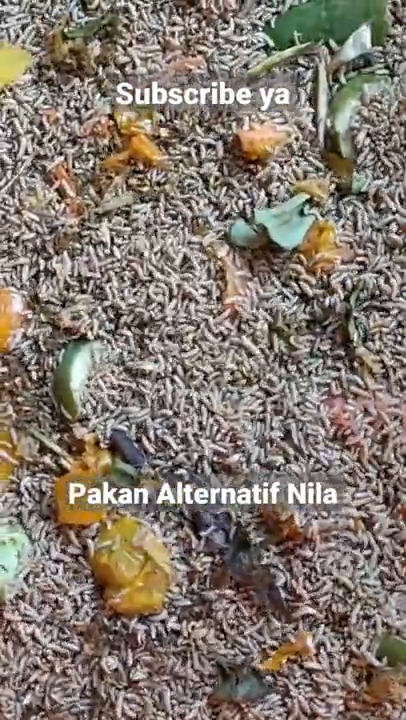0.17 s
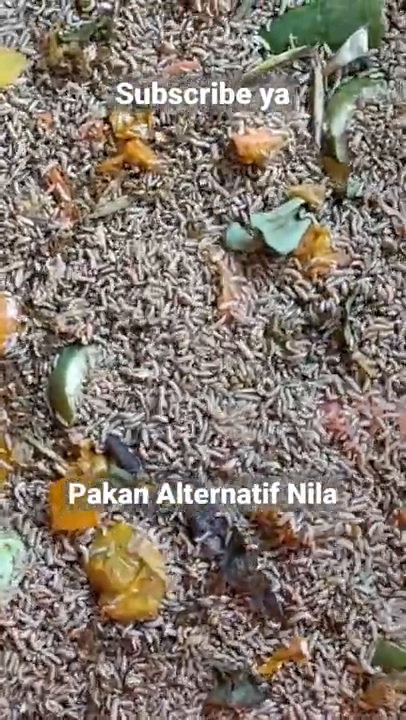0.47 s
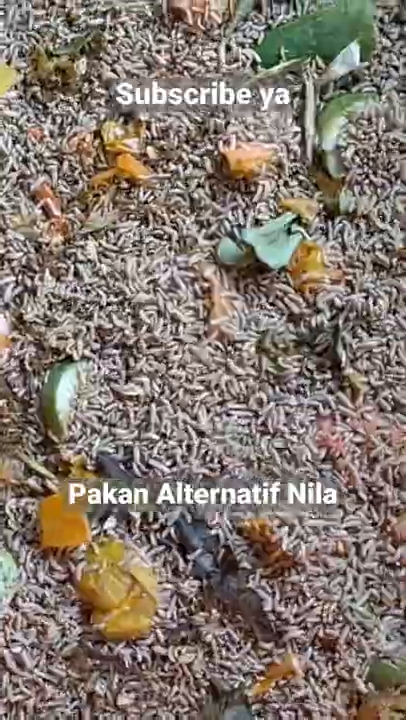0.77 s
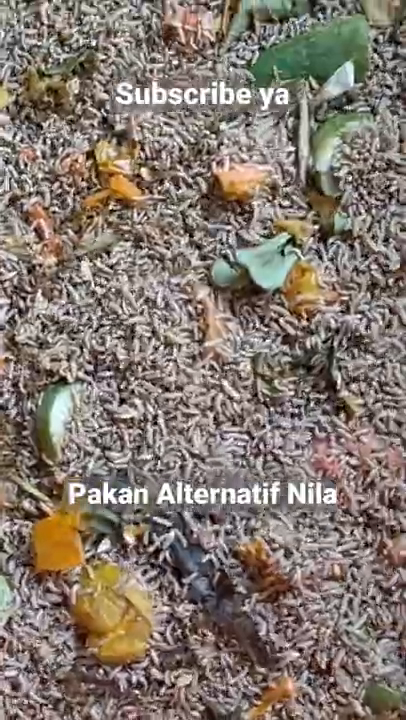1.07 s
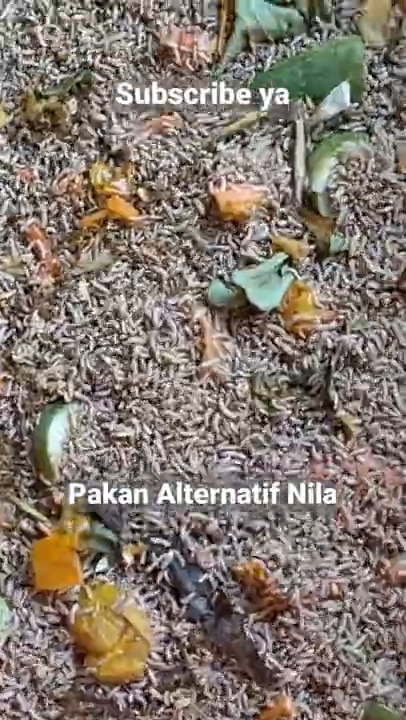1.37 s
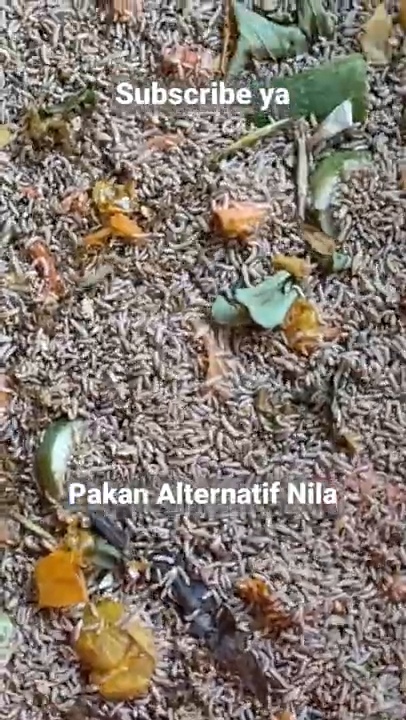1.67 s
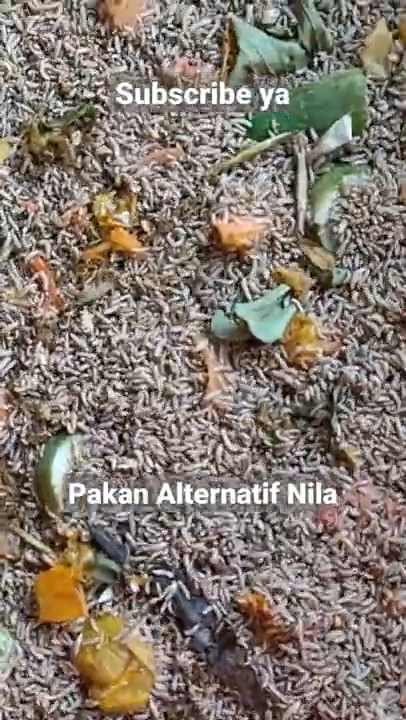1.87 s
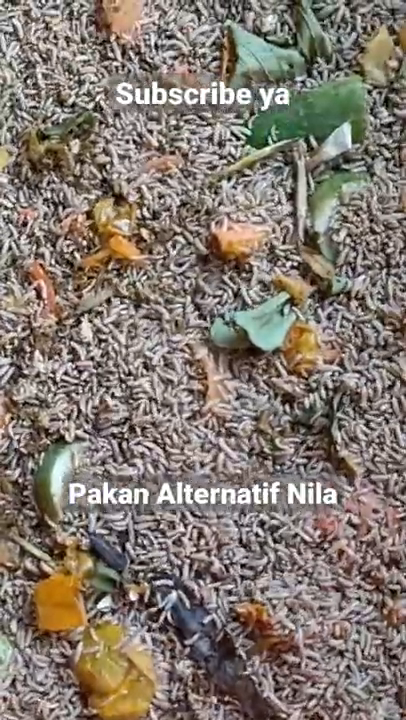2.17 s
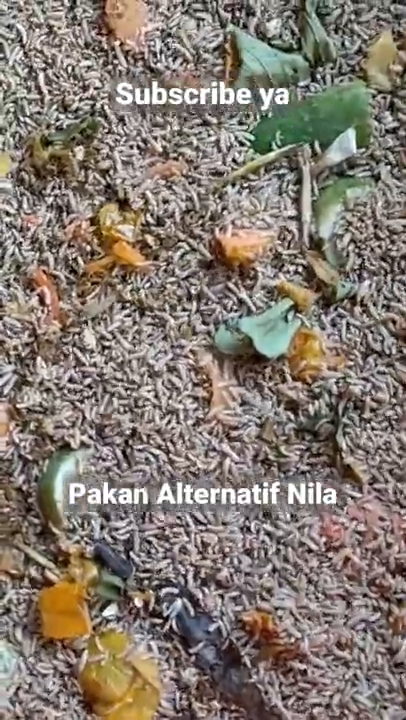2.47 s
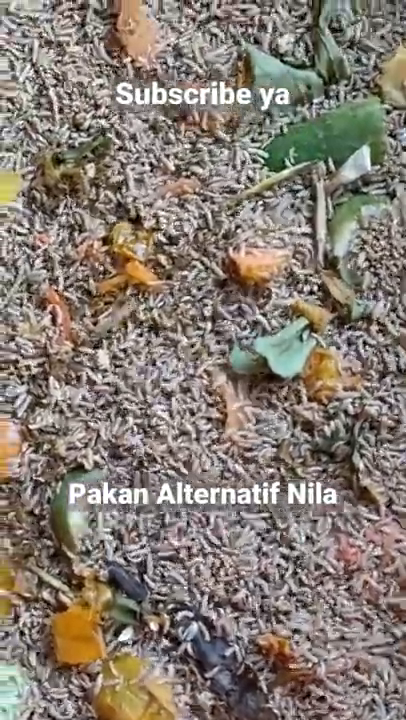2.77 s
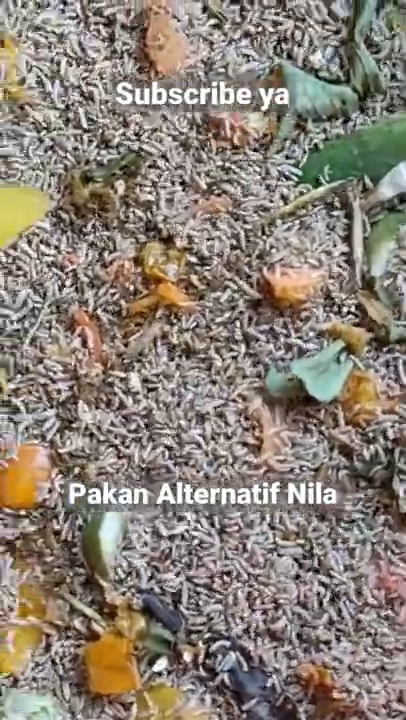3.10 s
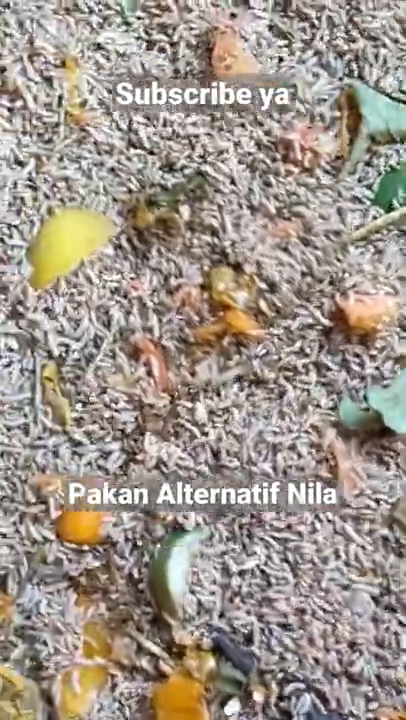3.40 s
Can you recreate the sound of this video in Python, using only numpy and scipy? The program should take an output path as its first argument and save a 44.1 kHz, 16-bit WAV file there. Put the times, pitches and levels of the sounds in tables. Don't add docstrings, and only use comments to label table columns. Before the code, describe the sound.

Countless larvae squirming in wet food scraps give a steady, close, wide crackling hiss throughout, slightly grainy from noise reduction. Small bubbles pop near 0.8, 1.0 on the right, 1.8, 3.1, 3.3 and 3.5 seconds. A distant cricket chirps in pure pulses around 0.2, 1.0, 1.9 and 2.9. A bird peeps briefly at 3.4, over faint far engine hum and very light air puffs.

```python
import sys
import numpy as np
from scipy import signal
from scipy.fft import rfft, irfft, next_fast_len
from scipy.io import wavfile
from scipy.ndimage import uniform_filter1d, map_coordinates

SR = 44100
rng = np.random.default_rng(int(sys.argv[2]) if len(sys.argv) > 2 else 0)


def boost_factor(decibels):
    exponent = np.asarray(decibels, float) / 20
    return 10 ** exponent


def unload_audio(sound):
    columns = np.transpose(np.atleast_2d(sound))
    steps = np.round(np.clip(columns, -1, 1) * 32767)
    wavfile.write(sys.argv[1], SR, steps.astype(np.int16))


N = 156114

# t/s, activity level/dB
ACTIVITY = [(0.0, -41), (0.03, -43), (1.25, -42.5), (1.28, -41), (1.52, -43), (2.44, -42.5), (2.66, -43.5),
            (2.87, -42.5), (3.11, -42.5), (3.15, -41.5), (3.19, -42.5), (3.41, -42.5), (3.43, -42),
            (3.54, -43.5)]
# f/Hz, density/dB
BODY_SPECTRUM = [(250, -3), (420, -6.5), (770, -3.5), (1300, -1.5), (2100, -1.5), (3600, -1), (4700, -4),
                 (5400, -13.5)]
# f/Hz, density/dB
FIZZ_SPECTRUM = [(4600, -3), (5400, -1.5), (6300, -5), (6800, -9), (7700, -11), (8200, -17), (11400, -20.5),
                 (11900, -27)]
# f/Hz, density/dB
SHEEN_SPECTRUM = [(10500, -29), (12300, -8), (13500, -8), (15400, -6)]
# t/s, f/Hz, peak level/dB, direction (-1 right .. 1 left), pitch rise
POPS = [
    (.760, 1058, -33.5, 0.26, .3),
    (0.955, 1400, -31.5, -0.82, 0.47),
    (1.755, 710, -35.5, .1, 4.2),
    (1.797, 1544, -38, 0.21, 1.4),
    (3.084, 846, -35.5, -0.22, .36),
    (3.257, 960, -37, -0.51, 0.34),
    (3.515, 870, -38, .1, 0.34),
]
# t/s, length/s, level/dB, direction (-1 right .. 1 left)
CRICKET_PULSES = [(0.133, 0.029, -42.5, 0.16), (0.187, 0.087, -44.5, 0.18), (.25, .035, -50, .35),
                  (.95, .04, -46, 0.28), (1.006, .07, -47.5, 0.43), (1.06, 0.054, -39.5, 0.39),
                  (1.125, .04, -45, .35), (1.843, 0.037, -42, 0.21), (1.91, 0.097, -42.5, 0.13),
                  (1.992, .065, -40.5, 0.31), (2.087, .03, -44, .02), (2.764, 0.057, -44, 0.18),
                  (2.844, 0.052, -45, .02), (2.917, 0.054, -41.5, 0.38), (3.008, 0.049, -46, .02)]
# t/s, length/s, f/Hz, level/dB
PEEPS = [
    (3.396, .018, 3900, -51),
    (3.412, .023, 3970, -43),
    (3.434, 0.023, 3800, -39),
]
# t/s, length/s, level/dB
ENGINE_SWELLS = [
    (.08, 0.18, -57),
    (.88, 0.34, -53.5),
]
# f/Hz, density/dB
HUM_SPECTRUM = [(75, -19), (100, -11.5), (130, -3.5), (180, 1.5), (240, -2), (310, -16), (420, -2.5),
                (700, -22)]
# f/Hz, density/dB
AIR_SPECTRUM = [(14, -37), (28, -17), (52, -11), (88, -3), (160, -44)]
# t/s, peak level/dB, f/Hz
PUFFS = [(.084, -67, 55), (.31, -57, 55), (.385, -62, 45.4), (.471, -58, 50), (.545, -61, 28),
         (.644, -60, 34.8), (.747, -63, 35), (1.06, -65, 25), (1.181, -62, 30), (1.258, -61, 55),
         (1.368, -66, 35), (1.45, -66, 50), (1.55, -65, 25), (1.624, -62, 55), (1.675, -63, 35),
         (1.772, -58, 45), (1.87, -64, 40), (1.936, -61, 55), (2.01, -61, 70), (2.131, -57, 57.6),
         (2.225, -60, 22), (2.305, -56, 36), (2.37, -62, 65), (2.5, -65, 30), (2.578, -67, 50),
         (2.716, -62, 35), (2.77, -64, 55), (2.907, -64, 50), (2.96, -62, 45), (3.048, -59, 55),
         (3.18, -66, 40), (3.245, -65, 40), (3.3, -64, 40), (3.41, -63, 40.4)]
# f/Hz, level/dB
PORT_TILT = [(150, 0), (400, 1.1), (1300, -1), (5000, -.7), (8800, 2.2), (14000, 2)]
# f/Hz, level re the usual level/dB
GATE_THRESHOLD = [(100, -26), (600, -7), (1250, -4), (2200, -6.5), (3300, -4), (4600, -4), (5500, -1),
                  (7600, 1)]
GATE_ROWS_HZ = [5500, 6700, 7350, 8100]

PORT_DELAY_S = 0.1658 / 343
T = np.arange(N) / SR
FFT_SIZE = next_fast_len(N + 8192)
FFT_HZ = np.fft.rfftfreq(FFT_SIZE, 1 / SR)


def unit(x):
    return x / np.sqrt(np.mean(x ** 2) + 1e-20)


def along(points, hz):
    f, value = np.transpose(points)
    return np.interp(np.log(hz + 1), np.log(f + 1), value)


def wobble(rate):
    return map_coordinates(rng.standard_normal(200), [T * rate])


def shaped(spectrum):
    low, high = spectrum[0][0] / 2, spectrum[-1][0] * 2
    return boost_factor(along([(low, -120)] + list(spectrum) + [(high, -120)], FFT_HZ))


def swell(start, length):
    return np.sin(np.pi * np.clip((T - start) / length, 0, 1))


def patchy(patchy_db):
    z = signal.stft(rng.standard_normal((2, N + 512)), nperseg=512)[2]
    field = rng.standard_normal(z.shape[1:])
    field = uniform_filter1d(uniform_filter1d(field, size=5, axis=0), size=7, axis=1)
    return signal.istft(z * boost_factor(patchy_db * unit(field)), nperseg=512)[1][:, :N]


def ports(buses, sides, colour=1):
    z = rfft(buses, FFT_SIZE)
    lead = np.exp(1j * np.pi * FFT_HZ * np.asarray(sides)[:, None] * PORT_DELAY_S)
    left, right = (z * lead).sum(0), (z / lead).sum(0)
    return irfft(np.array([left, right]) * colour, FFT_SIZE)[:, :N]


def around(pair, spectrum):
    axis_db, left_db = 1.5, .5
    grid = np.linspace(0, SR / 2, num=600)
    sides = np.cos(np.linspace(0, np.pi, num=90))
    weight = boost_factor(2 * axis_db * sides ** 2 + 2 * left_db * sides)
    alike = np.exp(-2j * np.pi * grid[:, None] * sides * PORT_DELAY_S) @ weight / weight.sum()
    alike = np.interp(FFT_HZ, grid, alike.real) + 1j * np.interp(FFT_HZ, grid, alike.imag)
    a, b = rfft(pair, FFT_SIZE) * shaped(spectrum)
    other = alike * a + np.sqrt(abs(1 - abs(alike) ** 2)) * b
    return unit(irfft(np.array([a, other]), FFT_SIZE)[:, :N])


def clicks():
    count, length = 9000, 256
    u, g = rng.random((count, 3)), rng.standard_normal(count)
    hz = np.clip(2212 * np.exp(0.746 * g), 400, 9000)[:, None]
    cycles = hz * np.arange(length) / SR
    size = boost_factor(-2 * np.log(u[:, 1:2] + 1e-4)) * np.sqrt(hz)
    ring = np.sin(2 * np.pi * cycles * (1 + 0.018 * cycles))
    wave = size * ring * np.exp(-3 * cycles / 4.34) * (1 - np.exp(-cycles))
    row = N + length
    start = (u[:, 2] * 2).astype(int) * row + (u[:, 0] * N).astype(int)
    at = start[:, None] + np.arange(length)
    return unit(np.bincount(at.ravel(), wave.ravel(), 2 * row).reshape(2, -1)[:, :N])


def larvae():
    click_share, fizz_db, sheen_db, fizz_grows = 0.079, -8, -30, 1.2
    s, level = np.transpose(ACTIVITY)
    mean_db = level.mean() + 4.0
    swing_db = np.interp(T, s, level - level.mean()) + 0.16 * wobble(9.61) + 0.17 * wobble(16)
    hiss = np.sqrt(1 - click_share) * unit(patchy(1.0))
    body = around(hiss + np.sqrt(click_share) * clicks(), BODY_SPECTRUM)
    fizz = boost_factor(fizz_db) * around(patchy(-1.0), FIZZ_SPECTRUM)
    sheen = boost_factor(sheen_db) * around(patchy(1.2), SHEEN_SPECTRUM)
    treble_gain = boost_factor(fizz_grows * swing_db + 0.18 * wobble(8))
    return boost_factor(mean_db) * (boost_factor(swing_db) * body + treble_gain * (fizz + sheen))


def pops():
    t60_s, attack_s, rise_damps, longest_s = 0.065, 0.0014, .04, .15
    start, hz, db, side, rise = np.transpose(POPS)[:, :, None]
    u = np.clip(T - start, 0, longest_s)
    ring = np.sin(2 * np.pi * hz * u * (1 + rise * u / t60_s))
    ring = ring * (1 - np.exp(-u / attack_s)) * (u < longest_s)
    decay_db = -60 * u / t60_s * (0.5 + rise_damps * rise ** 2)
    return ports(ring * boost_factor(db + decay_db), side[:, 0])


def cricket():
    pitch_hz, sag_hz = 2948, 25
    turns = pitch_hz * np.cumsum(1 + 0.00297 * wobble(48)) / SR
    waver = boost_factor(0.6 * wobble(36.8))
    pulses = []
    for start, length, db, _ in CRICKET_PULSES:
        shape = swell(start, length)
        envelope = np.sqrt(abs(shape)) * (shape > 1e-6)
        sag = sag_hz * (T - start - length / 2) ** 2 / (2 * length)
        pulses.append(boost_factor(db) * envelope * np.sin(2 * np.pi * (turns - sag)))
    return ports(waver * np.array(pulses), [side for *_, side in CRICKET_PULSES])


def bird():
    sag_hz_per_s, rough_db = 1700, 0.5
    notes = np.zeros(N)
    for start, length, hz, db in PEEPS:
        u = T - start
        notes += boost_factor(db) * swell(start, length) * np.sin(2 * np.pi * (hz - sag_hz_per_s * u) * u)
    return ports(notes[None] * boost_factor(rough_db * wobble(50)), [.05])


def yard(x):
    t60_s, length = .12, SR // 4
    tail = rng.standard_normal((2, length)) * boost_factor(-60 * np.arange(length) / SR / t60_s)
    return signal.fftconvolve(x, tail / np.linalg.norm(tail[0]), axes=1)[:, :N]


def engine():
    turns = 750 * np.cumsum(1 + 0.0121 * wobble(12)) / SR
    tone = np.sin(2 * np.pi * turns) * boost_factor(1.8 * wobble(18.5))
    return tone * sum(boost_factor(db) * swell(start, length) for start, length, db in ENGINE_SWELLS)


def puffs():
    length, gain_db, unlike_db = 0.049, 2, 1
    opposite = np.array([[1], [-1]])
    total = np.zeros((2, N))
    for start, db, hz in PUFFS:
        a, b, phase = rng.standard_normal(3)
        gain = boost_factor(db + gain_db + unlike_db * a * opposite)
        angle = 2 * np.pi * hz * (T - start - length / 2) + phase + 0.32 * b * opposite
        total += gain * swell(start, length) ** 2 * np.cos(angle)
    return total


def air():
    def brush():
        return ports(rng.standard_normal((1, N)), [0], shaped(AIR_SPECTRUM))

    flow = brush() + 0.59 * np.array([brush()[0] for _ in "LR"])
    lumps = boost_factor(1.7 * wobble(8.3) + 1.4 * np.array([wobble(17), wobble(10.1)]))
    return boost_factor(-79) * unit(lumps * flow)


def hum():
    return boost_factor(-52) * around(patchy(0.66), HUM_SPECTRUM)


def scene():
    voices = pops() + cricket() + bird()
    echo_db = -14
    return larvae() + voices + boost_factor(echo_db) * yard(voices) + engine() + puffs() + air() + hum()


def gate(x):
    hop, offset = 1024, 830
    top_db, scatter_db, row_hz, row_db = -1, 3.5, 130, 3.5
    n, k = np.arange(2 * hop)[:, None], np.arange(hop)
    window = np.sin(np.pi * (n + .5) / (2 * hop))
    basis = np.sqrt(2 / hop) * window * np.cos(np.pi / hop * (n + .5 + hop / 2) * (k + .5))
    padding = ((0, 0), (2 * hop - offset, 2 * hop + (offset - N) % hop))
    blocks = np.pad([x[0] + x[1], x[0] - x[1]], padding, mode="reflect").reshape(2, -1, hop) / 2
    z = np.concatenate([blocks[:, :-1], blocks[:, 1:]], axis=2) @ basis
    power = uniform_filter1d(uniform_filter1d(z ** 2, size=3), size=2, axis=1)

    mean_power = power.mean((0, 1))
    recent = uniform_filter1d(uniform_filter1d(power.mean(0), size=9, axis=0), size=120)
    lately = recent / uniform_filter1d(mean_power, size=120).clip(1e-20)
    usual = uniform_filter1d(mean_power, size=15) * lately

    scatter = uniform_filter1d(rng.standard_normal((2, z.shape[1], hop // 8)), size=2, axis=1)
    scatter = np.repeat(scatter, repeats=8, axis=2)
    hz = (k + .5) * SR / 2 / hop
    rows_db = row_db * sum(np.exp(-((hz - row) / row_hz) ** 2) for row in GATE_ROWS_HZ)
    edge_db = along(list(GATE_THRESHOLD) + [(SR / 3, top_db)], hz) + rows_db + scatter_db * unit(scatter)
    frames = (z * (power > usual * boost_factor(2 * edge_db))) @ basis.T
    joined = (frames[:, :-1, hop:] + frames[:, 1:, :hop]).reshape(2, -1)
    mid, side = joined[:, hop - offset:][:, :N]
    return np.array([mid + side, mid - side])


def roll_off(x):
    return signal.sosfilt(signal.butter(12, 15380, fs=SR, output="sos"), x)


def record(dry):
    tilt_db = along(PORT_TILT, FFT_HZ) / 2
    coloured = irfft(rfft(dry, FFT_SIZE) * boost_factor([tilt_db, -tilt_db]), FFT_SIZE)[:, :N]
    return roll_off(gate(coloured))


dry = scene()
out = record(dry)
unload_audio(out)
```